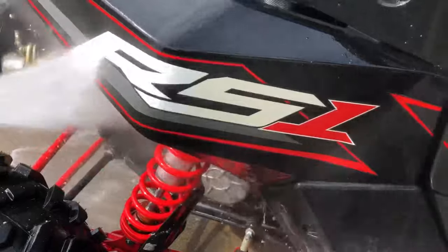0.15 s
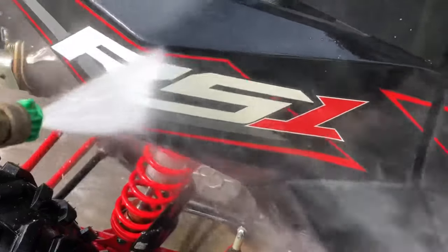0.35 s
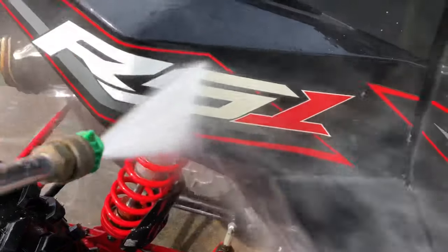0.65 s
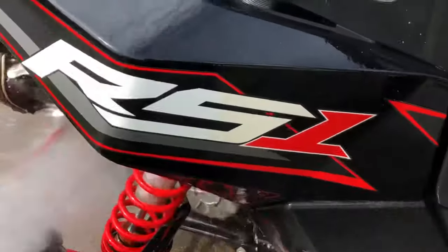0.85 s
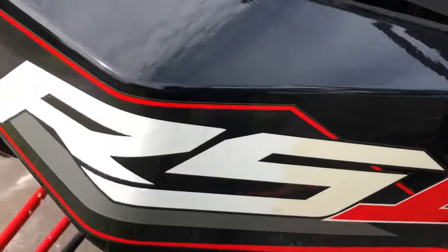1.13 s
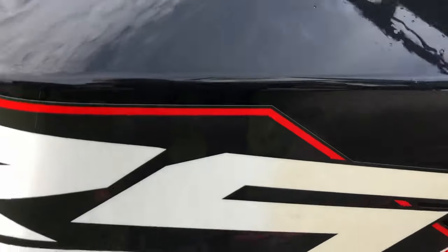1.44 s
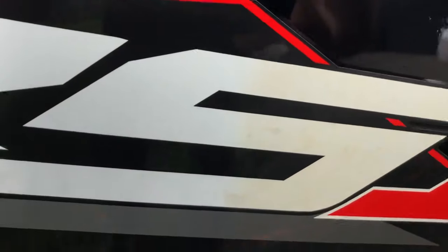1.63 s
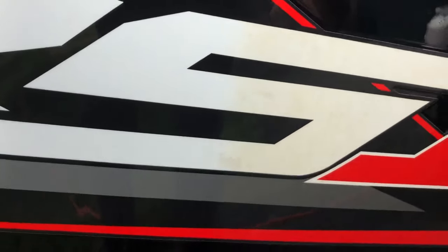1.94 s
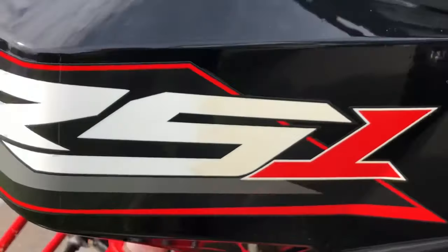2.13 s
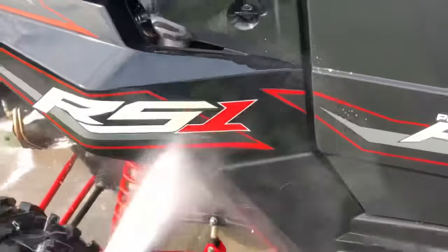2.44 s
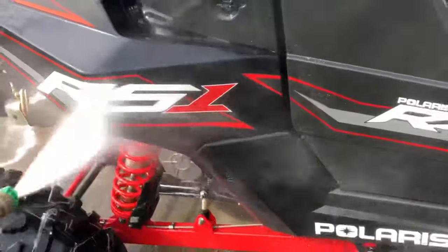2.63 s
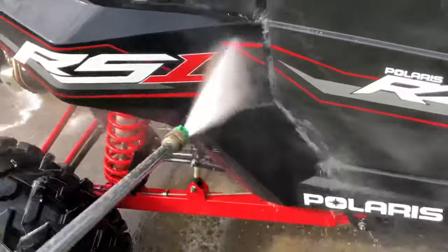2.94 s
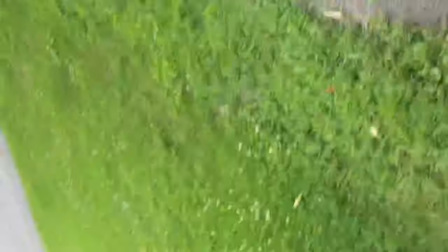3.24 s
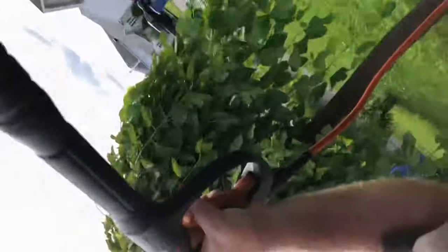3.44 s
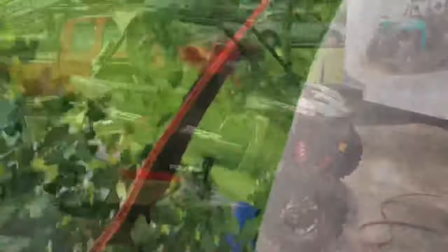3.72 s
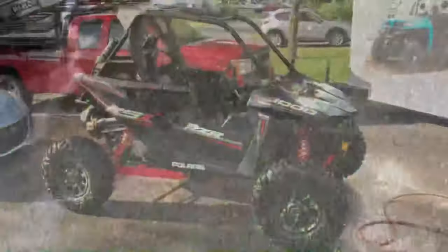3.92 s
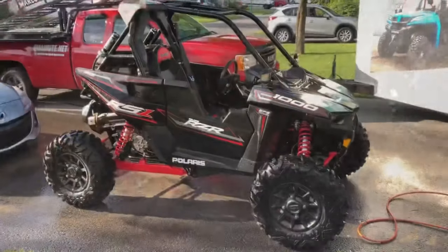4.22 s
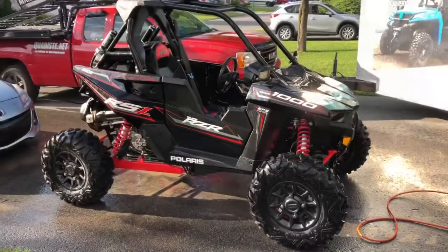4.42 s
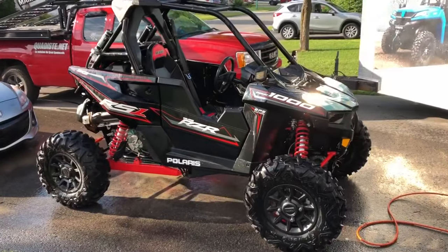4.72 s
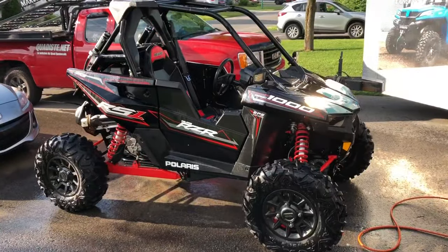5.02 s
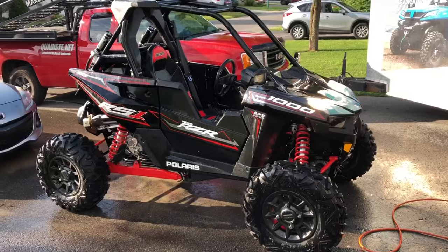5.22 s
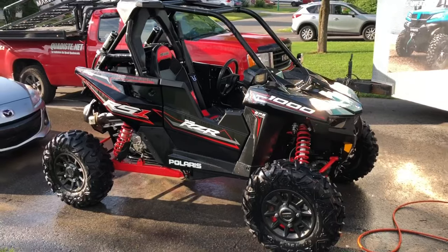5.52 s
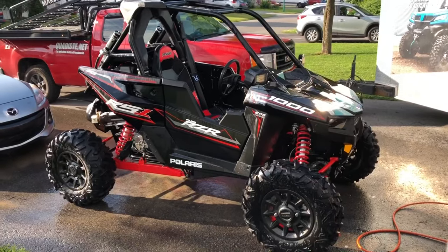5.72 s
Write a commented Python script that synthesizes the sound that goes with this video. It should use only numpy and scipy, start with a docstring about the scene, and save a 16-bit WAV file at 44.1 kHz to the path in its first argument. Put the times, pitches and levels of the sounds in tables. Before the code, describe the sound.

A dense water jet blasts an off-road buggy's plastic bodywork while a petrol engine drones beneath. Midway it becomes thinner with a boomier hum, then loud and splashy again. A whooshing, muffled swing follows before the jet quickly dies. The unloaded engine runs on very quietly outdoors, with dry handling ticks and low bumps close to the microphone.

```python
"""A water jet hisses and drums on the plastic body panels of an off-road buggy while a petrol engine hums.
The jet of this pressure washer is shaped noise with short echoes and sliding resonances; the single-cylinder
engine and its pump are sums of sine waves at multiples of the firing rate. The wand swings away, the jet
stops and the unloaded engine runs on faintly, with clicks, bumps and scuffs of handling made from tiny
impacts and fading tones. Soft outdoor noise lies under everything."""
import sys
import numpy as np
from scipy import signal
from scipy.io import wavfile
from scipy.ndimage import map_coordinates

SR = 44100
rng = np.random.default_rng(int(sys.argv[2]) if len(sys.argv) > 2 else 0)


def digitize_waveform(pressure):
    """Quantize a signal to 16-bit integers and store it at the path in sys.argv[1].

    Rows of a 2-D input are taken as channels; values are limited to [-1, 1].
    """
    field = np.atleast_2d(pressure).T
    bounded = np.clip(field, -1, 1)
    quanta = np.round(bounded * 32767).astype(np.int16)
    wavfile.write(sys.argv[1], SR, quanta)


N = 258426
TIME = np.arange(N) / SR
# the moment the jet has fully stopped
JET_OFF_S = 4.49
# the microphone is close to the panel, which screens the splashing and reflects the exhaust:
# start_s, end_s, fade_s
CLOSE_UP = (1, 2.3, 0.29)


def from_db(db):
    """Turn decibels into a gain."""
    return 10 ** (np.asarray(db) / 20)


def rms_one(x):
    """Scale a sound to an average (rms) strength of 1."""
    return x / np.sqrt(np.mean(x ** 2) + 1e-20)


def in_time(rows):
    """Read each column of a table as a curve with a value at every sample."""
    seconds, *columns = np.transpose(rows)
    return [np.interp(TIME, seconds, column) for column in columns]


def during(span):
    """1 within a span, 0 outside, with straight fades centred on its ends."""
    start_s, end_s, fade_s = span
    return np.clip(np.minimum(TIME - start_s, end_s - TIME) / fade_s + .5, 0, 1)


def swell(centre_s, half_s):
    """A bell-shaped rise and fall of height 1."""
    return np.exp(-.5 * ((TIME - centre_s) / half_s) ** 2)


def decay(start_s, t60_s):
    """A sudden start at height 1 that drops 60 dB in every t60_s, down to 180 dB."""
    return (TIME >= start_s) * from_db(-60 * np.clip((TIME - start_s) / t60_s, 0, 3))


def butter(x, hz, kind, order=2):
    """Filter with a smooth Butterworth slope, using only past sound."""
    safe_hz = np.clip(hz, 10, .47 * SR)
    return signal.sosfilt(signal.butter(order, safe_hz, kind, fs=SR, output="sos"), x)


def drift(rate_hz):
    """Slow random wandering of rms 1; a higher rate wanders faster."""
    # computed once every 40 samples, after letting the filter settle
    pole = np.exp(-80 * np.pi * rate_hz / SR)
    noise = rng.standard_normal(N // 40 + 2002)
    slow = signal.lfilter([1], [1, -2 * pole, pole * pole], noise)[2000:]
    return np.interp(np.arange(N) / 40, np.arange(len(slow)), rms_one(slow))


def banded_noise(spectrum, flutter_db):
    """Half-octave bands of noise whose levels flutter partly together; rms 1."""
    edges_hz = 20000 / 2 ** np.arange(9.5, -.1, -.5)
    hz, level_db = np.transpose(spectrum)
    together = drift(35)
    white = rng.standard_normal((2, N))
    out = 0
    for k, (low, high) in enumerate(zip(edges_hz, edges_hz[1:])):
        band_db = np.interp(np.log(low * high) / 2, np.log(hz), level_db)
        wander_db = flutter_db * (together + drift(25)) / 2
        # neighbouring bands use different noise
        band = butter(white[k % 2], [low, high], "band")
        out = out + band * from_db(band_db + wander_db)
    return rms_one(out)


def resonate(x, modes):
    """Ring side-by-side resonances, each evened out and then set to its own level; rms 1."""
    out = np.zeros(N)
    for hz, width_hz, db in modes:
        r = np.exp(-np.pi * width_hz / SR)
        ringing = signal.lfilter([1, 0, -1], [1, -2 * r * np.cos(2 * np.pi * hz / SR), r * r], x)
        out += from_db(db) * rms_one(ringing)
    return rms_one(out)


def outdoor_background():
    """Soft outdoor noise, strongest in the bass."""
    # pitch_hz, relative level per hertz (dB)
    outdoor_spectrum = [(18, -38), (30, -6.5), (64, -0.5), (123, -3), (197, -8), (341, -12), (532, -15.5),
                        (656, -17), (1360, -19.5), (1820, -24), (1970, -23), (15500, -44.5)]
    return from_db(-57.5) * banded_noise(outdoor_spectrum, flutter_db=1.5)


def tiny_impacts(per_s, spread_db):
    """Single-sample impacts of random size and sign at random moments; rms 1."""
    sizes = from_db(spread_db * np.minimum(rng.exponential(1, N), 4)) * rng.choice([-1, 1], N)
    return rms_one(sizes * (rng.random(N) < per_s / SR))


def grit(source, centre_hz, breadth):
    """Keep a broad band of the contacts around one pitch; rms 1."""
    band_hz = [centre_hz / (1 + breadth), centre_hz * (1 + breadth)]
    return rms_one(butter(source, band_hz, "band", order=1))


def handling():
    """Clicks ring the plastic with a crack and a burst, bumps thud, and scuffs stick and slip as they swell."""
    # clicks: start_s, level_db, centre_hz, t60_s, knock_db (relative to level_db)
    click_events = [(4.705, -60.5, 1100, 0.065, -1), (4.757, -52, 3600, 0.025, 1),
                    (4.762, -59, 6000, .03, -15), (4.766, -57.5, 3500, .025, -5),
                    (4.796, -57, 2800, .016, 3), (4.802, -66, 3500, .03, -8), (4.822, -62, 3000, .035, -2),
                    (4.953, -53, 6800, 0.016, -20), (5.343, -52, 9000, .05, -4),
                    (5.345, -49, 3540, 0.055, 3.5), (5.349, -52, 13000, .045, -8),
                    (5.3547, -42, 13000, .03, -17), (5.3585, -47, 13000, .025, -17),
                    (5.48, -64, 9000, .04, -15), (5.711, -61.5, 4200, 0.05, -15)]
    # dull bumps of the housing: start_s, level_db, pitch_hz, t60_s
    thud_events = [(4.709, -45, 192, 0.065), (4.722, -46, 330, 0.054), (5.345, -52, 260, .04),
                   (5.356, -48, 125, .13)]
    # gritty scuffs: centre_s, level_db, centre_hz, half_s (half length)
    scuff_events = [(4.726, -58, 900, .012), (4.803, -64, 2980, 0.04), (4.988, -54.5, 1300, .009),
                    (5.006, -59, 2700, .011), (5.026, -69, 3500, 0.023), (5.372, -63, 3500, 0.02)]
    # ringing of the handled plastic: pitch_hz, width_hz, relative level_db
    plastic_modes = [(1550, 400, 7), (2500, 300, 8), (3200, 260, 7), (3930, 250, 2), (6500, 500, -9),
                     (9900, 700, -7), (11700, 400, -11), (12800, 700, -9), (14800, 900, -1)]
    # ringing of its hollow body: pitch_hz, width_hz, relative level_db
    hollow_modes = [(220, 200, 0), (600, 300, -1), (1100, 220, -2), (1560, 200, 0)]
    crack_db, crack_t60_s = -1, 0.0044

    out = np.zeros(N)
    contacts = tiny_impacts(per_s=22000, spread_db=4.0)
    plastic = resonate(contacts, plastic_modes) + from_db(1) * contacts
    knock = resonate(contacts, hollow_modes)
    for start_s, db, hz, t60_s, knock_db in click_events:
        crack = from_db(crack_db) * decay(start_s, crack_t60_s)
        envelope = from_db(db) * (decay(start_s, t60_s) + crack)
        out += envelope * (grit(plastic, hz, breadth=0.26) + from_db(knock_db) * knock)
    for start_s, db, hz, t60_s in thud_events:
        out += from_db(db) * decay(start_s, t60_s) * np.sin(2 * np.pi * hz * (TIME - start_s))
    slips = rms_one(from_db(2.2 * drift(150)))
    sand = slips * tiny_impacts(per_s=14000, spread_db=0.0)
    for centre_s, db, hz, half_s in scuff_events:
        out += from_db(db) * swell(centre_s, half_s) * grit(sand, hz, breadth=0.41)
    return out


def count_firings():
    """Count the engine's firings as they add up, at a slightly unsteady speed."""
    # engine speed: time_s, firings_per_s (before the small random drift)
    firing_rate = [(0, 27.8), (1.1, 27.88), (3.3, 27.9), (4.35, 27.8), (4.55, 29.7), (5.1, 30.2),
                   (5.86, 29.7)]
    speed, = in_time(firing_rate)
    return np.cumsum(speed * (1 + 0.001917 * drift(4.88))) / SR


def engine_tone(firings, multiples, waver_db):
    """Sine waves at multiples of the firing rate, each wavering in level; rms 1."""
    total = np.zeros(N)
    for multiple, db in multiples:
        wave = np.sin(2 * np.pi * (round(multiple) * firings + rng.random()))
        total += from_db(db + waver_db * drift(3.8)) * wave
    return rms_one(total)


def engine(firings):
    """Crank note, exhaust hum and boom, pump whirr and whine; off load, a duller hum and a quieter pump remain."""
    # overall change of level as the microphone turns away and the load comes off: time_s, level_db
    engine_level = [(0, 0), (3.3, 0.5), (3.8, -1), (4.1, -6.5), (4.35, -12), (4.5, -16.5), (4.8, -19),
                    (5.3, -17.5), (5.86, -22)]
    # exhaust under load: multiple of the firing rate, relative level_db
    loaded_exhaust = [(3, -12), (4, -1), (5, -3), (6, -27), (7, -7.5), (8, -11), (9, -8.5), (12, -12.5)]
    # exhaust without load: multiple of the firing rate, relative level_db
    unloaded_exhaust = [(2, -1), (3, -9.5), (4, 0), (5, -12), (7, -22), (8, -12), (9, -9), (12, -13)]
    # pump whirr: multiple of the firing rate, relative level_db
    pump_multiples = [(16, -5), (19, -6), (24, -3.5), (26, -2), (27, -0.5), (29, 2.5), (32, -0.5), (37, -7),
                      (39, -4), (43, -2.5), (45, -4.5), (49, -5.5)]
    # the hum is stronger close to the panel and lingers a little: start_s, end_s, fade_s
    hum_swell = (1, 2.46, 0.26)
    # the pump's whine stands out for a moment: start_s, end_s, fade_s
    whine_swell = (2.6, 3.3, 0.1)
    # the load comes off over this time, ending as the jet stops
    unload_s = 0.11

    level_db, = in_time(engine_level)
    loaded = np.clip((JET_OFF_S - TIME) / unload_s, 0, 1)
    close = during(CLOSE_UP)

    # without load the engine fires unevenly, which turns its hum into a rumble
    idling = engine_tone(firings + .035 * drift(9), unloaded_exhaust, waver_db=2.0)
    working = engine_tone(firings, loaded_exhaust, waver_db=1.5)
    exhaust = loaded * working + (1 - loaded) * idling
    hum = from_db(-40.5 + 4 * during(hum_swell)) * exhaust
    # the tenth multiple booms, much more so close to the panel
    boom = from_db(-51 + 11.5 * close) * engine_tone(firings, [(10, 0)], waver_db=1.0)
    crank = from_db(-48.5) * engine_tone(firings, [(2, 0)], waver_db=1.0)

    # uneven strokes blur the high multiples
    uneven = firings + .0012 * drift(12)
    whirr_db = -41.5 + 1.5 * close - 16 * (1 - loaded)
    whirr = from_db(whirr_db) * engine_tone(uneven, pump_multiples, waver_db=4.0)
    whine_db = -49 + 9 * during(whine_swell)
    whine = from_db(whine_db) * engine_tone(uneven, [(28, 0)], waver_db=1.0)
    return from_db(level_db) * (hum + whirr + loaded * (crank + boom + whine))


def gliding_resonances():
    """Turbulence rings narrow resonances that come, slide and go as the geometry changes."""
    # gaps near the microphone, as it passes the panel and the wand swings by:
    # start_s, end_s, start_hz, end_hz, width_hz, level_db
    gap_glides = [(0.0, 0.3, 5950, 5900, 300, -44), (1.14, 1.25, 12750, 12900, 300, -45),
                  (1.42, 1.748, 10270, 11300, 450, -43), (1.451, 1.716, 3700, 3950, 280, -46),
                  (1.69, 1.83, 12900, 12050, 400, -39), (1.757, 1.88, 8250, 7950, 300, -41.5),
                  (1.842, 2.12, 7900, 8080, 330, -46), (1.85, 2.12, 12950, 13200, 200, -48),
                  (1.88, 2.08, 5600, 5700, 200, -50), (2.046, 2.18, 12700, 12550, 300, -42),
                  (2.174, 2.269, 3050, 2870, 300, -38.5), (2.96, 3.125, 9400, 8930, 1800, -34),
                  (3.311, 3.651, 597, 672, 170, -36), (3.33, 3.418, 1300, 1547, 900, -35.5),
                  (3.42, 3.538, 1597, 1566, 190, -37.5), (3.425, 3.582, 2850, 3250, 200, -46),
                  (3.54, 3.63, 1720, 1880, 160, -48), (3.59, 3.761, 245, 259.8, 129, -31.5),
                  (3.759, 3.98, 279, 275.3, 130, -38.5), (3.688, 3.882, 1300, 1496, 260, -42.5),
                  (3.839, 3.93, 1000, 894, 250, -44)]
    out = np.zeros(N)
    for start_s, end_s, start_hz, end_hz, width_hz, db in gap_glides:
        gain = during((start_s, end_s, .05))
        on = gain > 0
        pitch_hz = np.interp(TIME[on], [start_s, end_s], [start_hz, end_hz])
        phase = 2 * np.pi * np.cumsum(pitch_hz) / SR
        # two slow noises carried by a cosine and a sine make narrow noise around the sliding pitch
        slow_noise = butter(rng.standard_normal((2, SR)), width_hz / 2, "low")
        a, b = slow_noise[:, -len(phase):]
        out[on] += from_db(db) * gain[on] * rms_one(a * np.cos(phase) + b * np.sin(phase))
    return out


def reflected(x, path):
    """Return only a short echo whose delay and strength follow the movement."""
    path_ms, strength = in_time(path)
    return strength * map_coordinates(x, [(TIME - path_ms / 1000) * SR], order=3)


def impact(jet_db):
    """Water on the panels: splatter and hollow drumming follow the jet, with surges on top."""
    # splashing water: pitch_hz, relative level per hertz (dB)
    splatter_spectrum = [(150, -18), (300, -2), (450, 0.5), (780, -3.5), (1050, -4), (1500, -4.5),
                         (2200, -14), (4000, -21.5), (9000, -43.5)]
    # hollow panels: pitch_hz, relative level per hertz (dB)
    drumming_spectrum = [(30, -46), (50, -12.5), (80, -14.5), (120, -6.5), (180, -1), (300, -3),
                         (420, -8.5), (650, -25), (2000, -58)]
    # the jet catches a hollow panel or mist gusts by: centre_s, half_s (half length), drumming_db, splatter_db
    surge_events = [(0.256, 0.027, -35, -32), (0.904, 0.013, -29.5, -46), (2.524, 0.05, -33, -50),
                    (2.664, 0.026, -37, -33.5), (3.344, 0.021, -28, -27.5), (3.397, 0.024, -29.5, -30.5),
                    (3.545, 0.031, -32, -39), (3.62, 0.036, -35, -36)]
    close = during(CLOSE_UP)
    splatter = from_db(jet_db - 2 - 2 * close)
    # drumming follows only a share of the jet's swing about its full level of -28 dB
    drumming = from_db(-36.5 + 0.72 * (jet_db + 28) - 6.5 * close)
    for centre_s, half_s, drumming_db, splatter_db in surge_events:
        bump = swell(centre_s, half_s)
        # hypot adds the powers
        drumming = np.hypot(drumming, from_db(drumming_db) * bump)
        splatter = np.hypot(splatter, from_db(splatter_db) * bump)
    splashing = splatter * banded_noise(splatter_spectrum, flutter_db=0.4)
    return splashing + drumming * banded_noise(drumming_spectrum, flutter_db=-0.5)


def spray(firings):
    """Nozzle hiss, water on the panels, echoes and passing resonances, until the trigger is let go."""
    # the jet as the wand moves: time_s, level_db (shared base for its layers), top_db (treble against the rest)
    jet_curve = [(0.0, -28, 1), (0.12, -28.5, -0.5), (0.76, -28.5, 1), (0.96, -29.5, 0.5), (1.11, -33.5, 1),
                 (1.42, -33, 2), (2.22, -32, 1.5), (2.28, -31.5, 2.5), (2.3, -30, 3), (2.84, -30, -1),
                 (3.06, -28.5, -2.5), (3.3, -32, 0), (3.38, -33.5, -5.5), (3.52, -34.5, -11),
                 (3.73, -36, -10.5), (3.95, -33.5, 1), (4.33, -45, 3), (4.44, -54.5, 1.5), (4.48, -66, 2)]
    # nozzle hiss: pitch_hz, relative level per hertz (dB)
    hiss_spectrum = [(400, -18.5), (1000, -13.5), (2000, 0.5), (3200, 0.5), (6000, 0.5), (9000, 1),
                     (12000, -.5), (16000, 0)]
    # echoes near the panel and during the swing comb the spray as their paths change:
    # time_s, extra_path_ms, strength (0 to 1)
    panel_echo = [(1.05, 1.15, 0), (1.25, 1.1, .14), (1.47, .845, .16), (1.58, .825, .26), (1.73, .797, .2),
                  (1.88, .882, .24), (2.04, .862, .24), (2.14, .885, .18), (2.3, 1.0, 0)]
    swing_echo = [(3.2, 1.58, 0), (3.33, 1.55, .3), (3.45, 1.45, .3), (3.58, 1.22, .35), (3.68, .9, .25),
                  (3.8, .52, .35), (3.92, .8, .35), (4.05, 1.0, 0)]

    jet_db, top_db = in_time(jet_curve)
    noise = banded_noise(hiss_spectrum, flutter_db=0.77)
    # the top is beamed, so it fades when the nozzle points away
    body = butter(noise, 8000, "low", order=1)
    top = from_db(top_db) * (noise - body)
    hiss = from_db(jet_db + 4.5 - .5 * during(CLOSE_UP)) * (body + top)
    water = hiss + impact(jet_db)
    dull_water = butter(water, 5500, "low", order=1)
    echoes = reflected(water, panel_echo) + reflected(dull_water, swing_echo)
    # the pump's strokes ripple the pressure, twice per firing
    ripple = 1 + 0.021 * np.sin(2 * np.pi * 2 * firings)
    # the jet fades out over 14 ms
    valve = np.clip((JET_OFF_S - TIME) / 0.014, 0, 1)
    return valve * ripple * (water + echoes + gliding_resonances())


def scene():
    """Add all sources; spray and engine share one firing rhythm, and both channels carry the same sound."""
    firings = count_firings()
    mix = outdoor_background() + handling() + engine(firings) + spray(firings)
    return np.stack([mix] * 2)


def record(dry):
    """The microphone drops the deep bass and the top is cut steeply."""
    thin = butter(dry, 42, "high", order=6)
    top_cut = signal.ellip(12, .1, 80, 15850, fs=SR, output="sos")
    return signal.sosfilt(top_cut, thin)


dry = scene()
out = record(dry)
digitize_waveform(out)
```